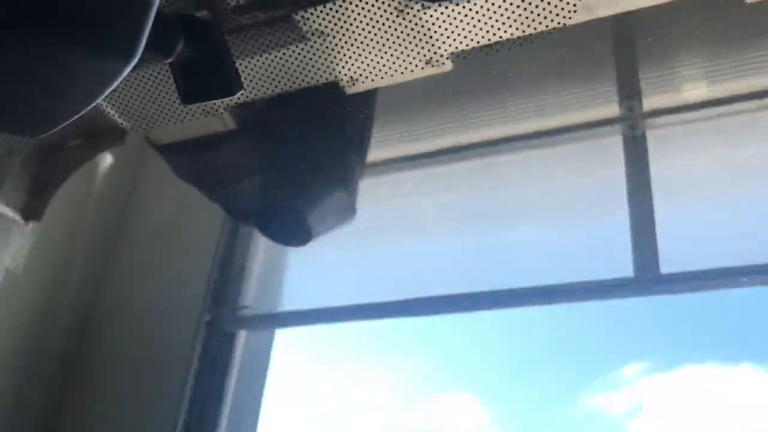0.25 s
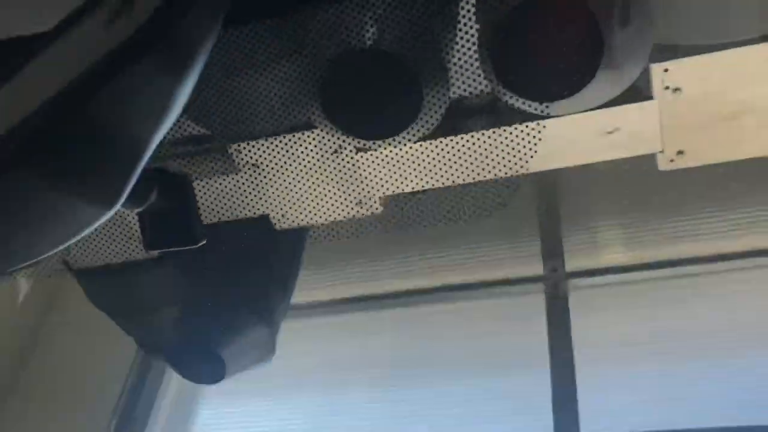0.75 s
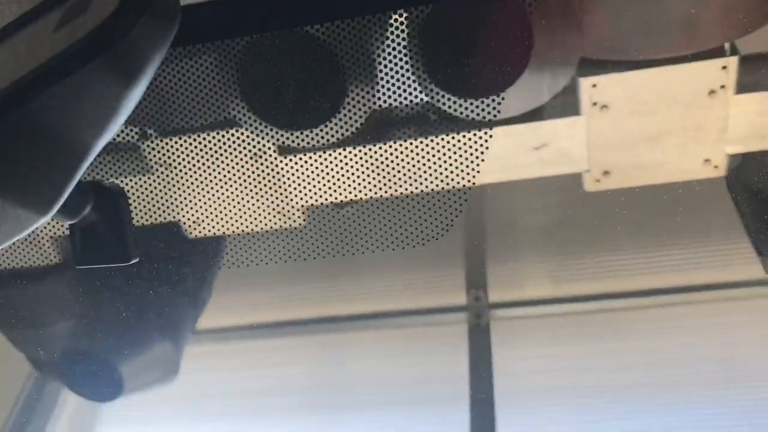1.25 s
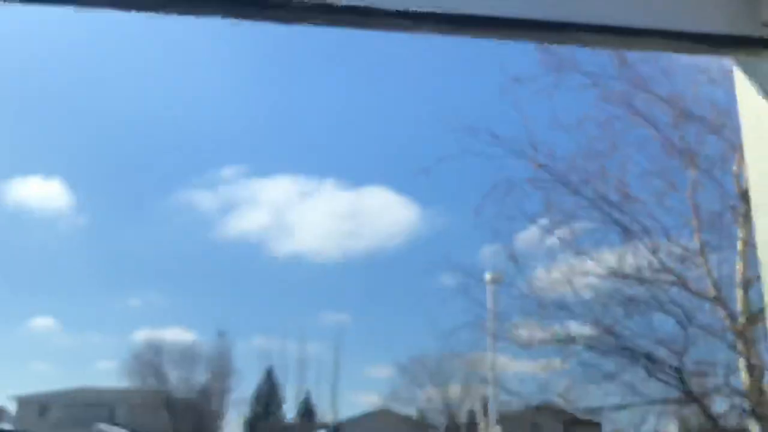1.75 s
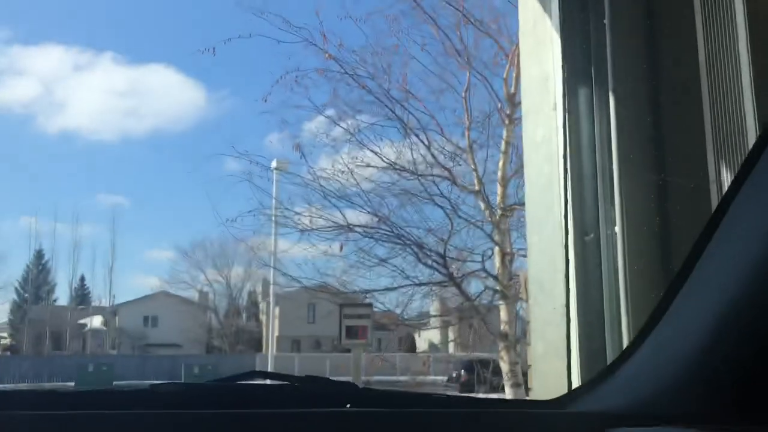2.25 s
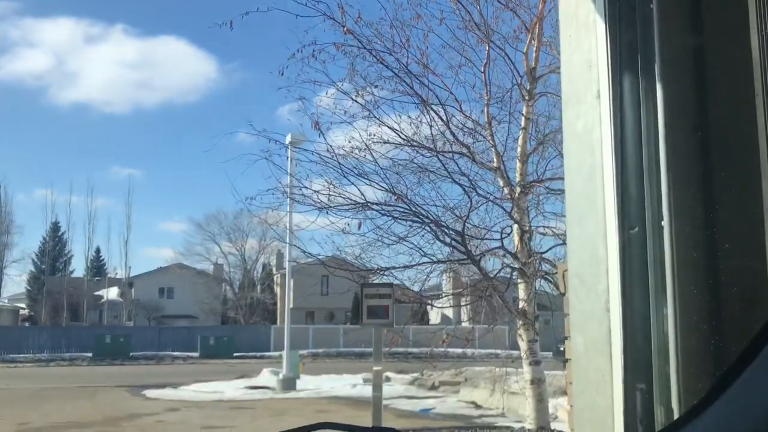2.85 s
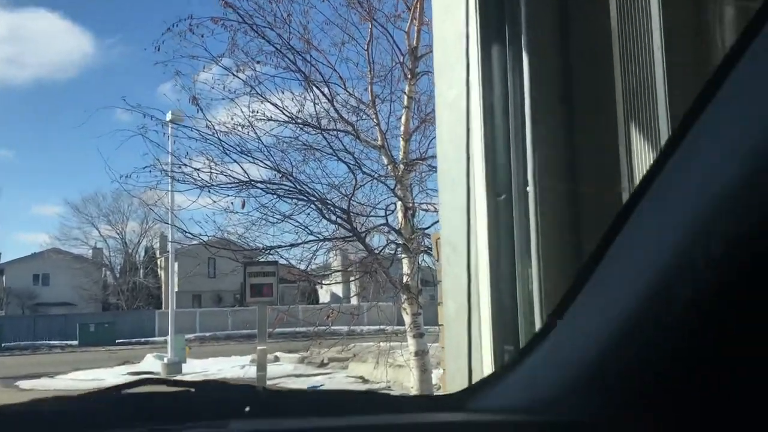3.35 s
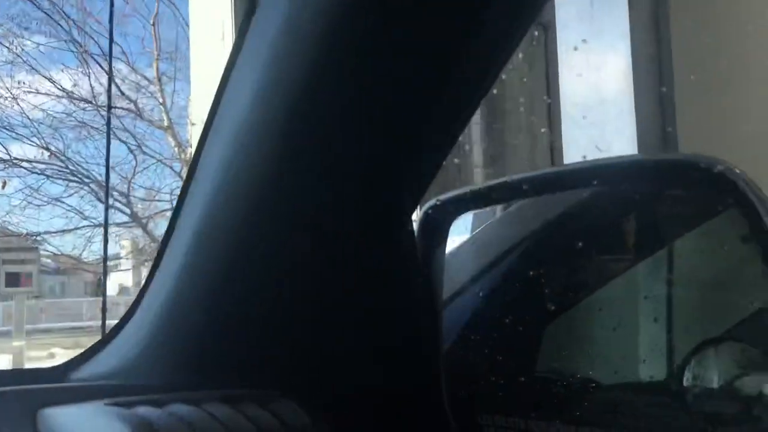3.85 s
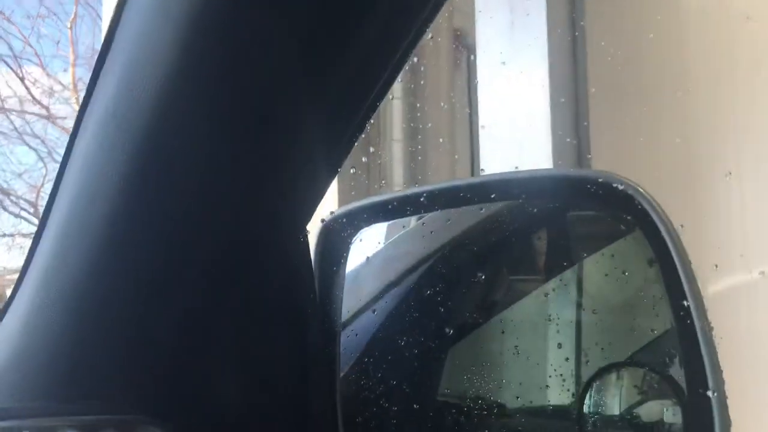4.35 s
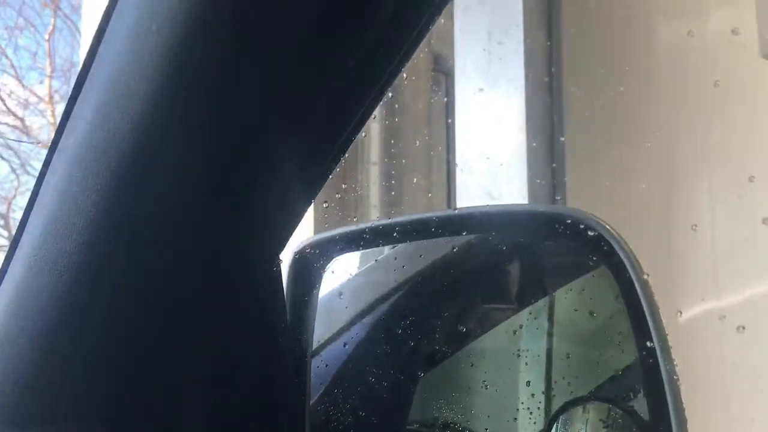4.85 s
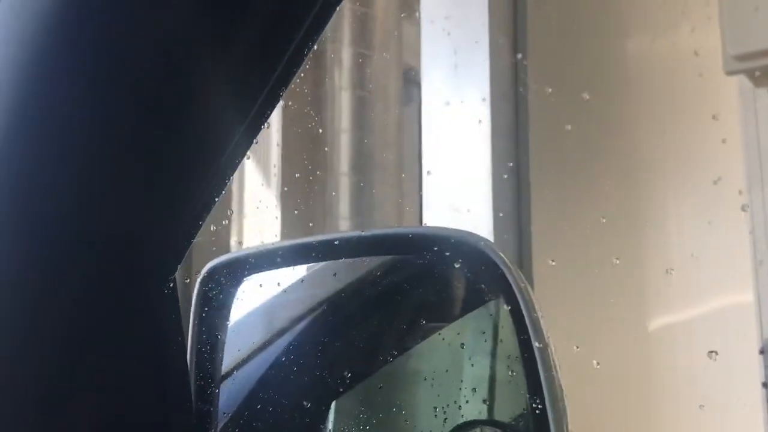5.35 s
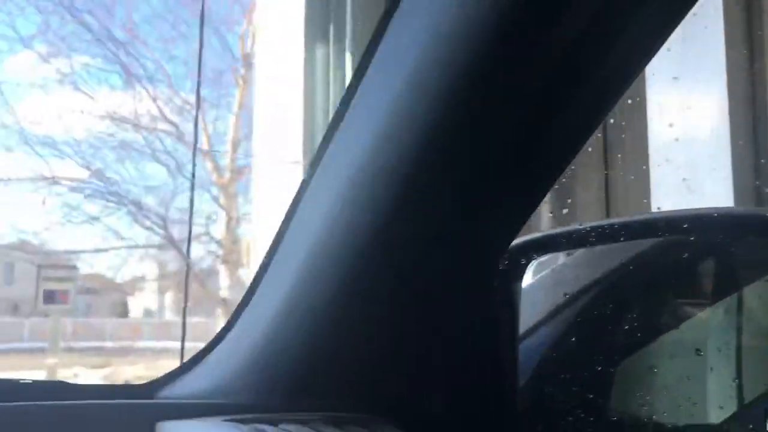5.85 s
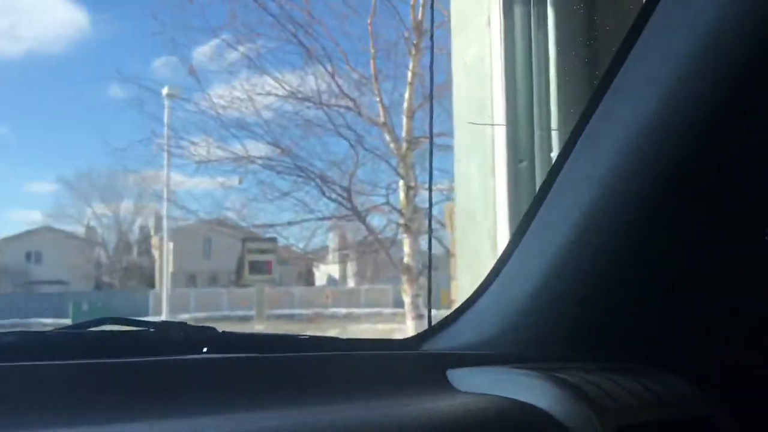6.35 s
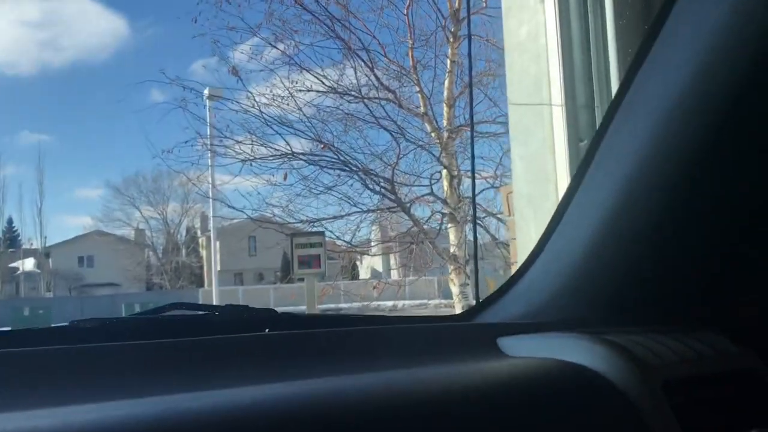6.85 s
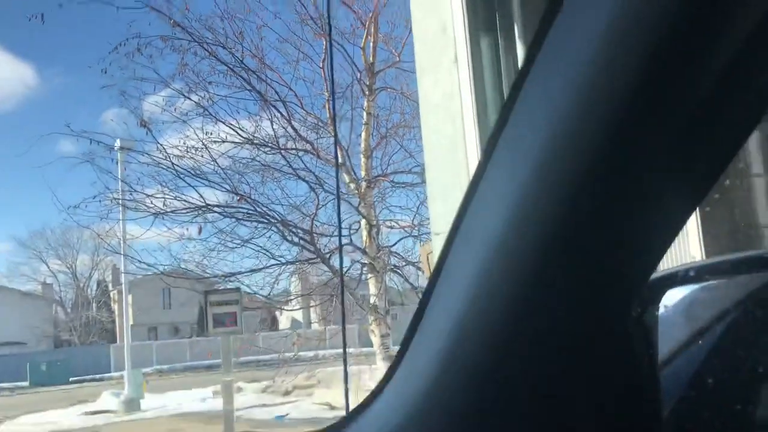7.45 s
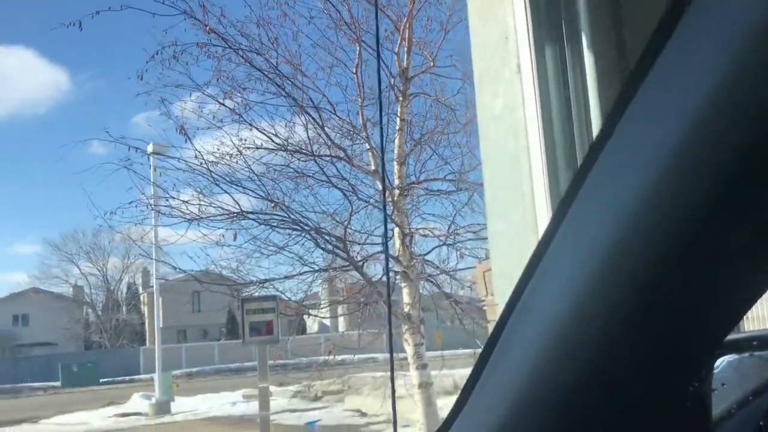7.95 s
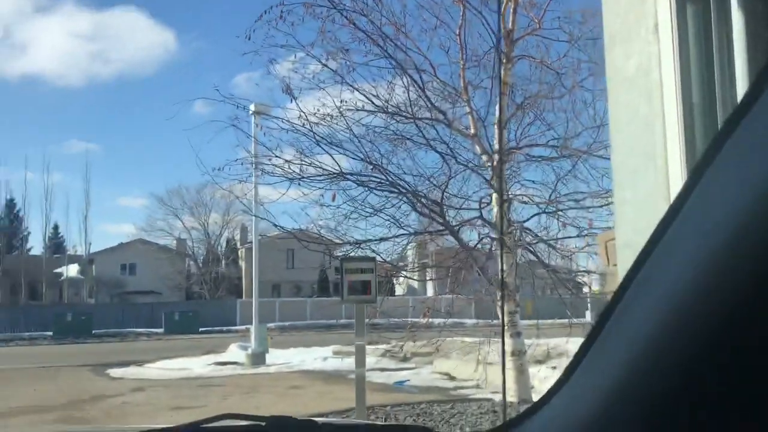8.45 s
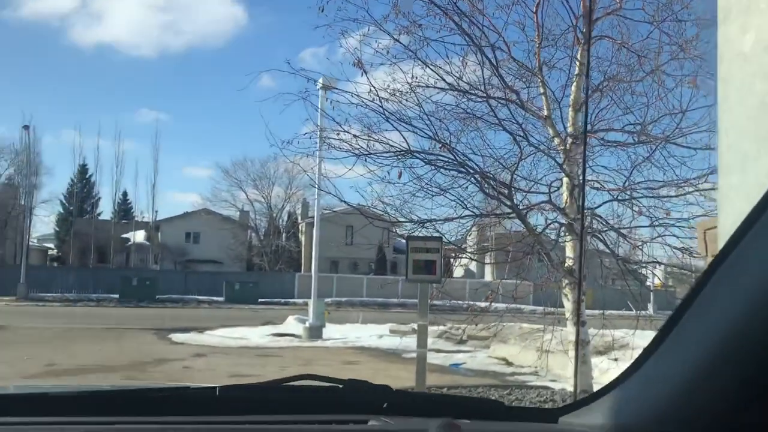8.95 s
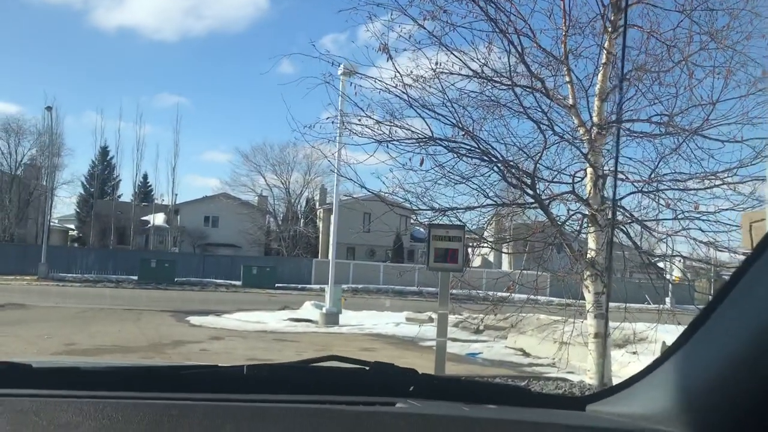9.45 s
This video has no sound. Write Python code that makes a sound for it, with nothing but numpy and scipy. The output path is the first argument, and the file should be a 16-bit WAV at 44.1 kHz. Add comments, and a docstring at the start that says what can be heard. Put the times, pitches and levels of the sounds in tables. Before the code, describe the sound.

From inside a closed car, the air jets of an automatic car wash make a continuous low rumble. They start at the windscreen with rushing air and spray hiss, then travel overhead, where the roof and door metal drone and hum in swells. Whistles fade in and out at the gaps. Finally the air surges at the rear with low thumps, droplets patter very faintly on the windows and the fading hiss turns hollow.

```python
"""A car creeps out under the dryer blowers of a car wash, heard from the front seat.
First the jets meet the windscreen: spray hisses, air rushes, the glass rumbles and gaps whistle thinly.
From about 2 s they travel over the roof, forcing cabin air and sheet metal into resonance: the cabin
booms, the roof drums and hums, and a very faint high ticking comes and goes. Near 8 s, with the jets
at the rear, droplets patter on the windows; then the hiss turns hollow and something swishes softly."""
import sys
import numpy as np
from scipy import signal
from scipy.fft import rfft, irfft, next_fast_len
from scipy.io import wavfile
from scipy.ndimage import uniform_filter1d, minimum_filter1d

SR = 44100
rng = np.random.default_rng(int(sys.argv[2]) if len(sys.argv) > 2 else 0)


def materialize(psi):
    """Save the field psi as 16-bit PCM at rate SR to the path in sys.argv[1].

    A 1-D psi becomes a single channel; in a 2-D psi each row is a channel.
    """
    bounded = np.clip(np.atleast_2d(psi).T, -1, 1)
    quanta = np.round(bounded * 32767).astype(np.int16)
    wavfile.write(sys.argv[1], SR, quanta)


N = 427329
TIME = np.arange(N) / SR
HZ = np.maximum(np.fft.rfftfreq(N, 1 / SR), 1)


def from_db(db):
    """Amplitude ratio of a level in decibels."""
    return 10 ** (np.asarray(db) / 20)


def unit_rms(x):
    """Normalisation to unit mean power."""
    return x / np.sqrt(np.mean(x ** 2) + 1e-20)


def curve(rows):
    """Linear interpolation of (t/s, value) rows at every sample."""
    return np.interp(TIME, *np.transpose(rows))


def bell(centre_s, half_width_s):
    """Gaussian envelope, down to 1/e at one half-width from its centre."""
    return np.exp(-((TIME - centre_s) / half_width_s) ** 2)


def swell_power(rows):
    """Incoherent addition: Gaussian swells sum in power."""
    return sum(from_db(db) ** 2 * bell(start + length / 2, length / 2) for start, length, db in rows)


def noise(gain):
    """Spectral shaping of white noise by a gain at each frequency; rms 1."""
    size = next_fast_len(N, real=True)
    shape = np.interp(np.fft.rfftfreq(size, 1 / SR), HZ, gain)
    return unit_rms(irfft(rfft(rng.standard_normal(size)) * shape, size)[:N])


def drift(rate_hz):
    """Random fluctuation: low-passed noise of rms 1."""
    return noise(1 / (1 + (HZ / rate_hz) ** 2))


def turbulence(spectrum):
    """Broadband flow noise, falling 12 dB per octave beyond the ends of its spectrum; rms 1."""
    hz, db = np.transpose(spectrum)
    skirts = np.minimum(HZ / hz[0], 1) ** 2 * np.minimum(hz[-1] / HZ, 1) ** 2
    return noise(from_db(np.interp(np.log(HZ), np.log(hz), db)) * skirts)


def evened(x, steadiness, hold_s):
    """Envelope compression: a steady drive evens out the slow swells of a resonance; rms 1."""
    local_power = uniform_filter1d(x ** 2, int(hold_s * SR)) + 1e-6
    return unit_rms(x / local_power ** (steadiness / 2))


def resonance(modes, steadiness, hold_s):
    """Forced vibration: turbulence keeps a set of modes ringing; rms 1."""
    power = 0
    for hz, width, db in modes:
        detuning = (HZ ** 2 - hz ** 2) / (HZ * width)
        power += from_db(db) ** 2 / (1 + detuning ** 2 / 2) ** 3
    return evened(noise(np.sqrt(power)), steadiness, hold_s)


# path of the jets: t/s, place (0 windscreen, 1 roof, 2 rear)
JET_PATH = [(0, 0.067), (1.6, 0.023), (2.0, 0.62), (3.5, 0.27), (3.9, 1.12), (5.6, 0.82), (6.2, 1.63),
            (7.5, 1.84), (9.69, 1.79)]

def travelling(*sounds):
    """Moving source: an equal-power crossfade between sounds ordered from front to rear."""
    place = curve(JET_PATH)
    stations = np.linspace(0, 2, len(sounds))
    shares = [np.interp(place, stations, row) for row in np.eye(len(sounds))]
    return sum(np.sqrt(share) * sound for share, sound in zip(shares, sounds))


# jets dwelling on a part: part, arrival t/s, departure t/s, edge/s, level/dB
JET_PASSES = [("glass", 0.33, 2.87, 0.36, -18.5), ("glass", 6.9, 9.2, 0.54, -19.5),
              ("roof", 1.8, 7.33, 0.12, -20), ("roof", 8.8, 9.9, .1, -18.5),
              ("panels", 1.65, 7.47, 0.037, -21.5), ("panels", 8.63, 9.9, 0.14, -22.5),
              ("cabin", 1.3, 5.3, .3, -26), ("cabin", 6, 9.7, 0.27, -19.5), ("shell", -.5, 1.58, 0.04, -26),
              ("shell", 1.36, 3.35, 0.15, -31.5), ("shell", 7.35, 9.7, .4, -24)]
# steady shaking of each part: part -> level/dB
IDLE_LEVELS = {"cabin": -32, "glass": -24, "roof": -24.5, "panels": -21.5, "shell": -29}

def drive(part, extra_power=0):
    """Aerodynamic forcing: steady shaking, dwelling jets and swells add in power; gives an amplitude."""
    power = from_db(IDLE_LEVELS[part]) ** 2 + extra_power
    for name, arrives, leaves, edge, db in JET_PASSES:
        if name == part:
            onset = (1 + np.tanh((TIME - arrives) / (2 * edge))) / 2
            release = (1 + np.tanh((leaves - TIME) / (2 * edge))) / 2
            power = power + from_db(db) ** 2 * onset * release
    return np.sqrt(power)


def reflected(x, strength, longest_s, sway_s, count):
    """Early reflections from glass and trim; their delays shift as the listener moves."""
    out = x.copy()
    for k in range(count):
        wander = np.interp(TIME, np.linspace(0, TIME[-1], count + 1), rng.standard_normal(count + 1))
        delay = longest_s * (k + 1 + rng.random()) / (count + 1) + sway_s * wander
        out += (-1) ** k * strength / np.sqrt(count) * np.interp(TIME - delay, TIME, x)
    return out / np.sqrt(1 + strength ** 2)


# spray spectra with the jets at the front, at the rear and behind the car: f/Hz, relative level/dB
SPRAY_FRONT = [(900, -25.5), (1600, -6), (2250, -3), (2460, 1.5), (2620, -1.5), (2820, 0.5), (3100, -5),
               (4400, -10), (4850, -16), (5400, -14), (6400, -16.5), (7600, -25), (9800, -29), (10500, -35),
               (11200, -32), (15800, -39)]
SPRAY_REAR = [(900, -24), (1600, -4), (2100, -3.5), (2450, -1.5), (2900, -2.5), (3400, -3), (4450, -7),
              (4850, -13), (5500, -15.5), (6100, -15.5), (7500, -24), (9600, -28.5), (10500, -34.5),
              (11300, -30.5), (15800, -31.5)]
SPRAY_BEHIND = [(900, -20), (1600, -6.5), (2050, -10.5), (2450, -2), (2950, 0.5), (3400, -2.5),
                (4400, -5.5), (4850, -13), (5500, -14.5), (6200, -14), (7500, -23), (9600, -27),
                (10500, -34.5), (11300, -29.5), (15800, -30)]
# spray thinning as the car dries: t/s, level/dB
SPRAY_LEVEL = [(0, -34.5), (0.6, -35.6), (1.25, -36.5), (1.58, -36.5), (2.2, -40), (2.5, -39.5),
               (3.75, -45), (4.25, -45), (4.6, -44), (5.1, -45.4), (5.42, -45), (5.8, -47.5), (6.6, -45.5),
               (7.3, -46.5), (7.7, -47.5), (9.2, -51), (9.69, -50.8)]

def spray_hiss(lift_db, clear_at_s=8.6, clearing_s=0.3):
    """Impact noise: spray on the glass merges into a hiss, which turns hollow as the jets fall behind."""
    level_db = curve(SPRAY_LEVEL) + lift_db + 0.5 * drift(rate_hz=45)
    behind = (1 + np.tanh((TIME - clear_at_s) / clearing_s)) / 2
    on_car = travelling(turbulence(SPRAY_FRONT), turbulence(SPRAY_REAR))
    return from_db(level_db) * (np.sqrt(1 - behind) * on_car + np.sqrt(behind) * turbulence(SPRAY_BEHIND))


# air stream spectra at the front and at the rear: f/Hz, relative level/dB
STREAM_FRONT = [(300, -14), (500, 0.5), (660, 2), (790, 0.5), (900, -1), (1050, 0.5), (1240, -2),
                (1370, -2.5), (1520, -4.5), (1720, -7.5), (2200, -9.5), (3500, -37.5)]
STREAM_REAR = [(300, -9), (560, 9), (630, 4), (690, 4.5), (760, 1.5), (850, 3.5), (1000, -3.5),
               (1200, -2.5), (1420, -8), (1570, -8), (2000, -19), (3500, -42.5)]
# air stream, strongest on the windscreen and the rear window: t/s, level/dB
STREAM_LEVEL = [(0, -32), (1.25, -32.5), (1.5, -32), (2.1, -34), (3.7, -37), (5.4, -38), (5.75, -38.5),
                (6.6, -34.5), (7.75, -30.5), (8.4, -32), (8.85, -36), (9.69, -38)]
# the stream catches an edge of the car: centre t/s, half-width/s, lift/dB
EDGE_FLARES = [(1.487, 0.1, 0.5), (4.597, 0.099, 1), (5.302, .2, 0.3), (7.697, 0.067, 2), (7.957, .015, 4),
               (8.106, 0.018, 0), (8.296, .01, 4.5)]

def air_stream(gust):
    """Jet noise: turbulent air rushes with the gusts and flares at edges; its spray follows less."""
    flare_db = sum(db * bell(centre, half_width) for centre, half_width, db in EDGE_FLARES)
    rush_db = curve(STREAM_LEVEL) + flare_db + 0.8 * gust + 0.5
    rush = from_db(rush_db) * travelling(turbulence(STREAM_FRONT), turbulence(STREAM_REAR))
    return rush + spray_hiss(lift_db=0.5 * flare_db + 0.33 * gust + 0.08)


# body shell spectra with the jets on windscreen, roof and rear: f/Hz, relative level/dB
SHELL_FRONT = [(200, -30), (265, -5), (320, 1.5), (400, 3.5), (455, -2), (520, -10), (570, -23.5),
               (900, -50)]
SHELL_ROOF = [(235, -16), (285, 5.5), (315, 5.5), (355, 1), (400, -8.5), (470, -2.5), (510, -17.5),
              (560, -14), (800, -26)]
SHELL_REAR = [(260, -19.5), (315, -15.5), (345, 1.5), (390, 1), (450, -2.5), (500, -10.5), (570, -18.5),
              (700, -16), (1000, -46)]
# gusts on the shell: start t/s, duration/s, level/dB
SHELL_GUSTS = [(1.57, 0.064, -22.5), (6.13, 0.13, -30), (8.05, .07, -18.5), (8.27, 0.039, -19),
               (9.13, 0.057, -21), (9.5, 0.13, -25)]

def shell_roar(gust):
    """Transmission through a wall: the body shell passes the low part of the turbulence as a roar."""
    roar = travelling(*map(turbulence, (SHELL_FRONT, SHELL_ROOF, SHELL_REAR)))
    return drive("shell", swell_power(SHELL_GUSTS)) * from_db(0.58 * gust) * roar


# modes of the front and rear glass: f/Hz, width/Hz, relative level/dB
WINDSCREEN_MODES = [(69.3, 15, -2.5), (86.7, 23, -1.5), (108, 26, -7)]
REAR_WINDOW_MODES = [(57, 17, -1), (66.7, 14, -4), (95.6, 21, -5.5)]
# gusts that thump the glass and the cabin air: start t/s, duration/s, level in the cabin/dB
THUMP_GUSTS = [(1.92, 0.05, -16), (3.18, .13, -19), (4.66, 0.11, -16.5), (4.9, 0.12, -18.5),
               (7.19, 0.1, -16), (7.7, 0.16, -14.5), (8.07, 0.064, -14), (8.83, 0.051, -14)]

def glass_rumble(thump_gain_db=-2.5):
    """Plate resonance: the jets drive the bending modes of the windscreen, later of the rear window."""
    panes = [resonance(modes, steadiness=0.83, hold_s=0.16)
             for modes in (WINDSCREEN_MODES, REAR_WINDOW_MODES)]
    thumps = from_db(thump_gain_db) ** 2 * swell_power(THUMP_GUSTS)
    return drive("glass", thumps) * travelling(*panes)


# whistles and howls: centre t/s, half-width/s, f/Hz, filter bandwidth/Hz, level/dB
EDGE_TONES = [(0.8, 1, 285, 80, -24.5), (0.7, 0.87, 2500, 200, -46), (1.35, 0.34, 1500, 170, -44.5),
              (1.55, 0.2, 860, 160, -39), (1.65, 0.4, 8400, 2500, -64.5), (2.255, 0.34, 2195, 130, -46),
              (2.807, 0.57, 401, 59, -29.5), (3.2, 0.62, 673, 129.5, -42.5), (3.1, 0.35, 2480, 253, -48.5),
              (3.15, .35, 8400, 900, -70.5), (4.8, .5, 8450, 1000, -74.5), (6.494, 0.49, 1855, 221, -51),
              (7.199, 0.54, 887, 39.7, -43), (7.63, 0.17, 6090, 450, -62), (7.601, .3, 1560, 220, -44),
              (8.0, .45, 1160, 478, -42.5), (7.697, 0.44, 2450, 260, -55.5), (8.352, 0.43, 417, 70, -29),
              (8.567, 0.11, 364, 55, -19), (8.807, 0.095, 377, 60, -18.5), (9.115, 0.025, 9200, 550, -67),
              (9.13, 0.02, 11150, 450, -71)]

def whistles():
    """Edge tones: air over edges and gaps sounds in narrow bands that swell and fade."""
    out = np.zeros(N)
    for centre, half_width, hz, bandwidth, db in EDGE_TONES:
        near = np.abs(TIME - centre) < 3 * half_width
        gap = signal.butter(1, [hz - bandwidth / 2, hz + bandwidth / 2], "band", fs=SR, output="sos")
        tone = unit_rms(signal.sosfilt(np.vstack([gap, gap]), rng.standard_normal(N)[near]))
        envelope = from_db(db) * bell(centre, half_width)[near]
        out[near] += envelope * evened(tone, steadiness=0.78, hold_s=0.044)
    return out


# modes of the enclosed air: f/Hz, width/Hz, relative level/dB
CAVITY_MODES = [(42, 11, -2), (50.4, 18, -7)]

def cabin_boom():
    """Cavity resonance: jets and thumping gusts excite the air shut in the cabin."""
    return drive("cabin", swell_power(THUMP_GUSTS)) * resonance(CAVITY_MODES, steadiness=0.78, hold_s=0.1)


# modes of the door panels: f/Hz, width/Hz, relative level/dB
SHEET_METAL_MODES = [(161.3, 22.5, 1.5), (176.8, 15, -0.2), (200, 19, -0.4), (231.7, 30, -5.5),
                     (259, 41, -10.5)]

def panel_drone():
    """Random excitation: the sheet metal of the doors rings unevenly under the jets."""
    return drive("panels") * resonance(SHEET_METAL_MODES, steadiness=0.28, hold_s=0.17)


# modes of the roof: f/Hz, width/Hz, relative level/dB
ROOF_PLATE_MODES = [(129.4, 10.7, 1), (120, 47, -13)]
# brief louder swells of the roof's low drone: start t/s, duration/s, relative level/dB
ROOF_SWELLS = [(2.468, 0.11, -10.5), (2.753, 0.034, -10), (2.892, 0.14, -9), (3.405, 0.033, -9),
               (3.634, 0.046, -7.5), (4.163, 0.098, -11), (4.786, 0.038, -12.5), (5.334, 0.063, -10.5),
               (5.46, 0.051, -8), (5.64, 0.058, -9), (6.242, 0.076, -13), (6.946, 0.023, -9),
               (7.176, 0.038, -8)]

def roof_drum(swell_gain_db=-1.5):
    """Plate resonance: under the jets the roof drones, mainly in one narrow mode, and briefly swells."""
    swells = from_db(swell_gain_db) ** 2 * swell_power(ROOF_SWELLS)
    return drive("roof", swells) * resonance(ROOF_PLATE_MODES, steadiness=0.74, hold_s=0.081)


# swells of the ticking: start t/s, duration/s, level/dB
TICKING_SWELLS = [(1.9, .6, -56.5), (3.35, .35, -62), (3.9, 1.4, -66), (6.05, 0.35, -59),
                  (6.5, 0.82, -62.5), (8.1, .6, -65)]

def ticking(pitch_hz=14200, spread_hz=450, half_width_s=0.002, idle_db=-69.5):
    """Amplitude modulation: a slowly quickening pulse train cuts narrow-band noise into high pips."""
    ticks_per_s = 13.6 + 0.77 * TIME
    from_pip_s = (np.cumsum(ticks_per_s) / SR % 1 - 0.5) / ticks_per_s
    amplitude = np.sqrt(from_db(idle_db) ** 2 + swell_power(TICKING_SWELLS))
    carrier = noise(np.exp(-((HZ - pitch_hz) / spread_hz) ** 2))
    return amplitude * np.exp(-(from_pip_s / half_width_s) ** 2) * carrier


# spells of steady humming: start t/s, duration/s, peak level/dB
HUM_SPELLS = [(2.45, 1, -20), (4.12, 0.27, -15), (4.7, 0.28, -24), (5.42, .32, -18), (5.95, .45, -19)]

def roof_hum(pitch_hz=130.6, wander_hz=1.094):
    """Sustained oscillation: in steady flow the roof rings on one slightly wandering pitch."""
    hz = pitch_hz + wander_hz * drift(rate_hz=2.87)
    return np.sqrt(swell_power(HUM_SPELLS)) * np.sin(2 * np.pi * np.cumsum(hz) / SR)


# flurries of droplets on the windows: start t/s, duration/s, level/dB
DROP_FLURRIES = [(7.66, .09, -67), (7.89, .14, -67), (8.06, .09, -67), (8.29, .05, -70), (8.58, .07, -72)]

def droplets(hits_per_s=1500, spread_db=2.0, idle_db=-77, band_hz=(5600, 12000), pitches=14, cycles=16):
    """Impulse response: each drop rings on the glass at one pitch, dying by 60 dB over `cycles`."""
    sizes = from_db(spread_db * np.minimum(rng.exponential(1, N), 4)) * rng.choice([-1, 1], N)
    hits = sizes * (rng.random(N) < hits_per_s / SR)
    pitch_index = rng.integers(0, pitches, N)
    patter = np.zeros(N)
    for k, hz in enumerate(np.geomspace(*band_hz, pitches)):
        radius = np.exp(-np.log(1000) * hz / (cycles * SR))
        resonator = [1, -2 * radius * np.cos(2 * np.pi * hz / SR), radius ** 2]
        patter += signal.lfilter([1, 0, -1], resonator, hits * (pitch_index == k) + 1e-18)
    return np.sqrt(from_db(idle_db) ** 2 + swell_power(DROP_FLURRIES)) * unit_rms(patter)


# spectrum of a soft brushing: f/Hz, relative level/dB
BRUSH_SPECTRUM = [(1200, -9), (1650, 6), (2000, -9), (2400, -2), (4500, -34), (11200, -32), (15500, -37)]

def swish(at_s=9.14, half_width_s=0.03, level_db=-43.5):
    """Friction noise: something brushes softly inside the car."""
    return from_db(level_db) * bell(at_s, half_width_s) * turbulence(BRUSH_SPECTRUM)


def scene():
    """Superposition at the front seat; the same gusts move rush, hiss and roar together."""
    gust = drift(rate_hz=33)
    air = reflected(air_stream(gust), strength=0.18, longest_s=0.007, sway_s=0.0003, count=6)
    body = shell_roar(gust) + glass_rumble() + cabin_boom() + panel_drone() + roof_drum()
    return (air + body + whistles() + ticking() + roof_hum() + droplets() + swish())[None]


def record(dry):
    """Peak limiting: the gain dips ahead of the highest peaks; the ends fade and the top is cut."""
    ceiling, hold, fade_s, cutoff_hz = 0.92, int(0.02 * SR), 0.003, 15800
    needed_gain = ceiling / np.maximum(np.abs(dry), ceiling)
    gain = uniform_filter1d(minimum_filter1d(needed_gain, hold), hold)
    fades = np.minimum(np.minimum(TIME, TIME[-1] - TIME) / fade_s, 1)
    low_pass = signal.ellip(10, 0.1, 80, cutoff_hz, fs=SR, output="sos")
    return signal.sosfilt(low_pass, dry * gain * fades)


dry = scene()
out = record(dry)
materialize(out)
```